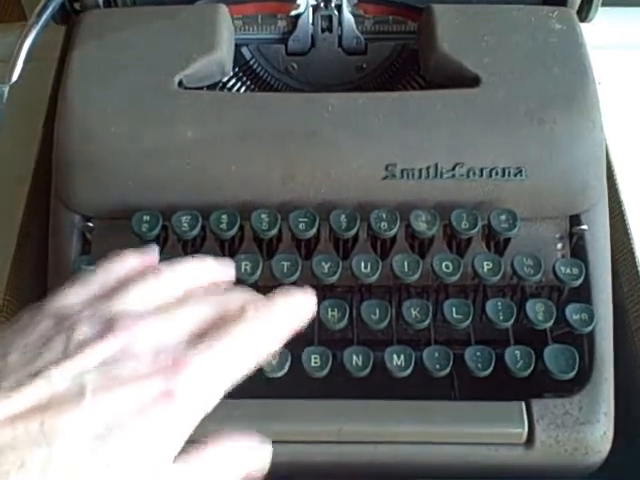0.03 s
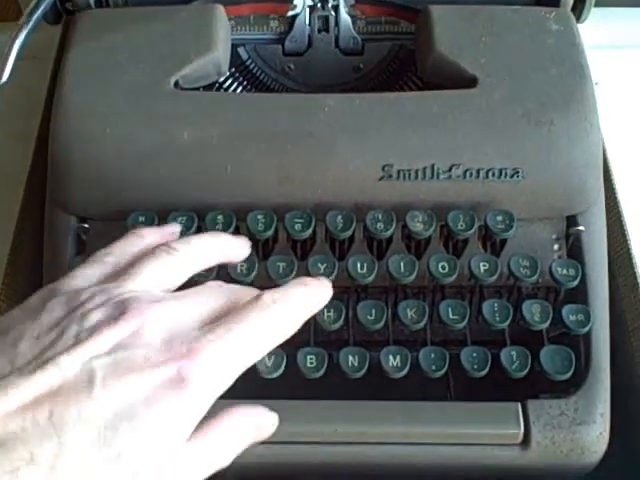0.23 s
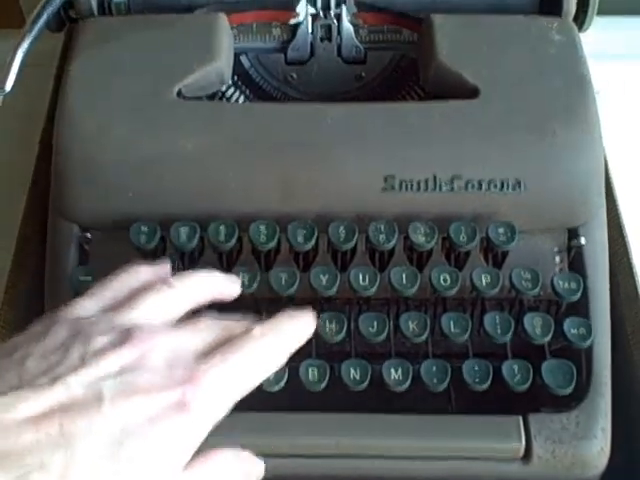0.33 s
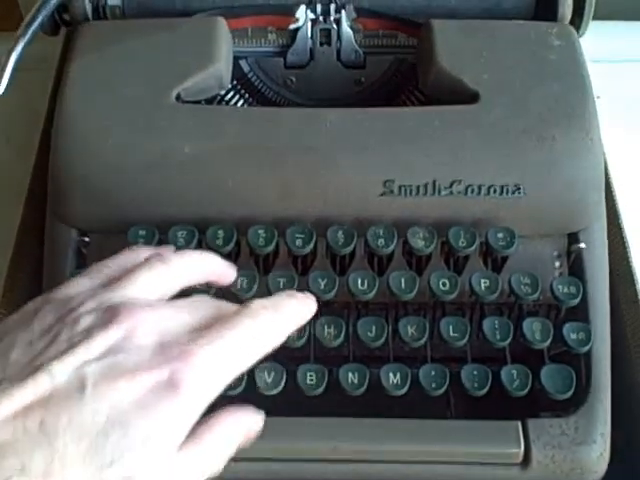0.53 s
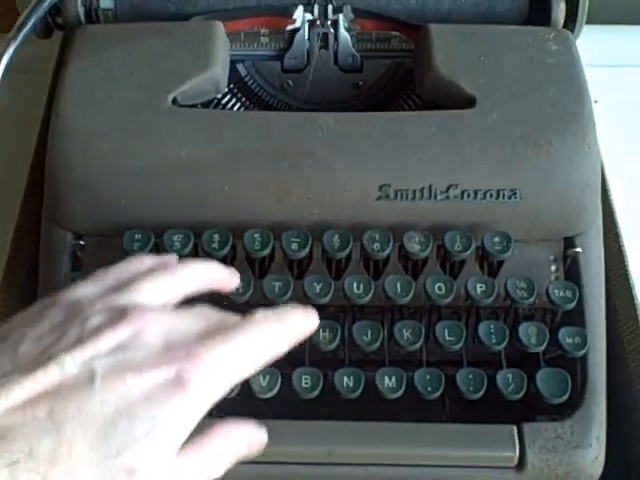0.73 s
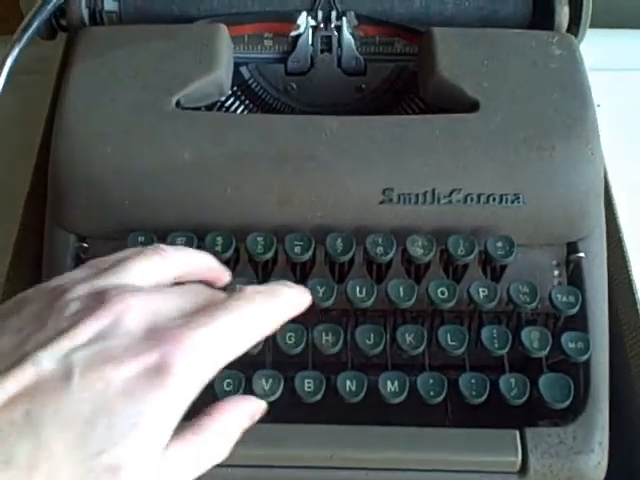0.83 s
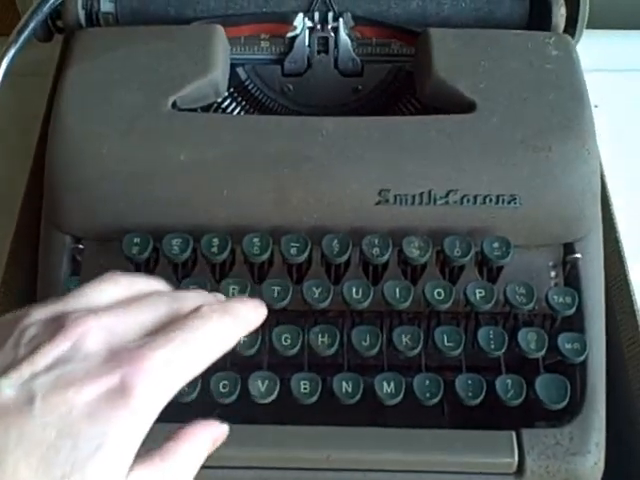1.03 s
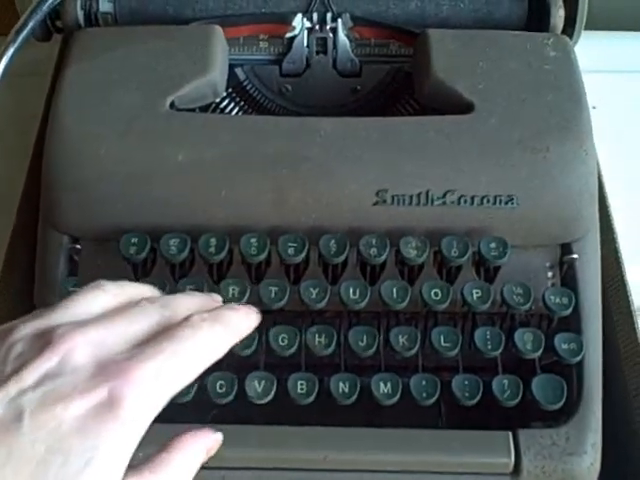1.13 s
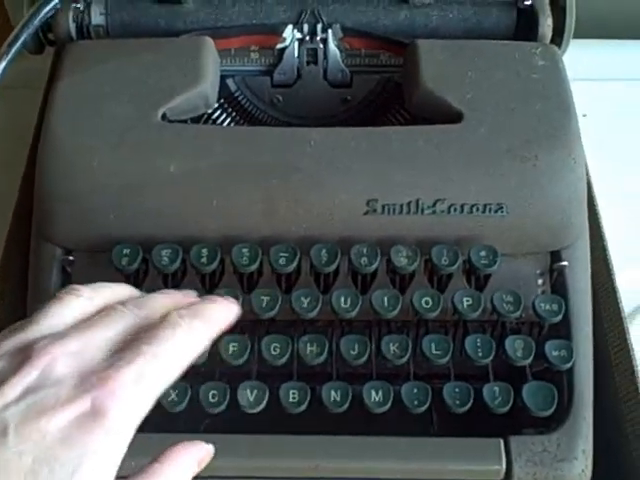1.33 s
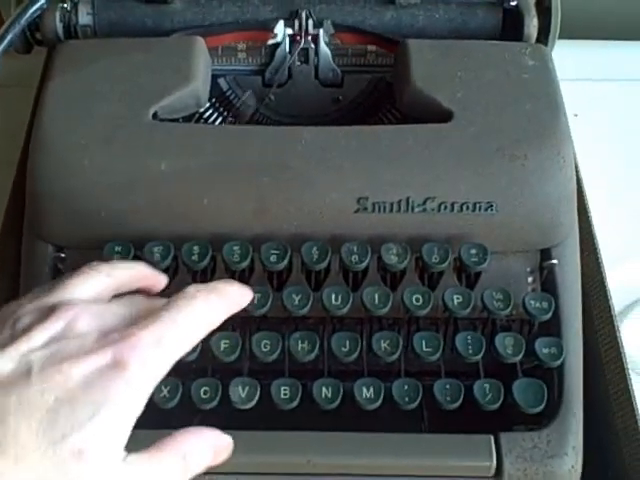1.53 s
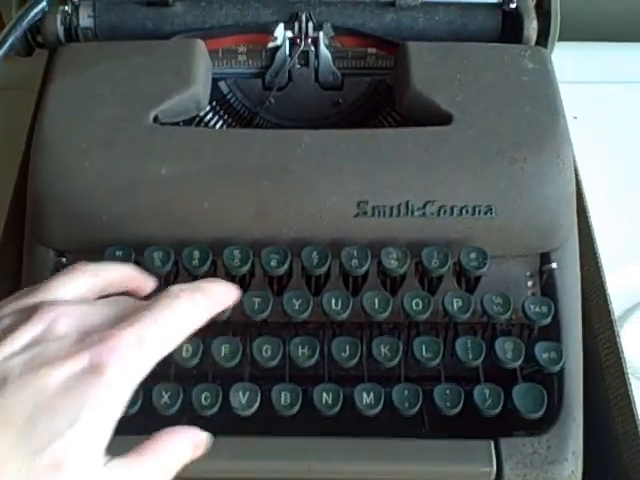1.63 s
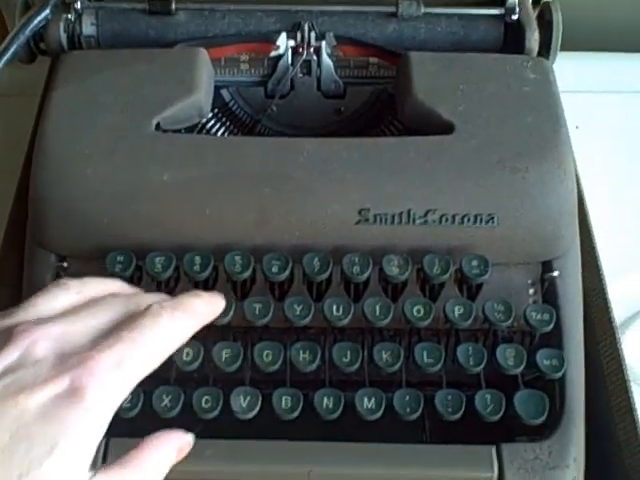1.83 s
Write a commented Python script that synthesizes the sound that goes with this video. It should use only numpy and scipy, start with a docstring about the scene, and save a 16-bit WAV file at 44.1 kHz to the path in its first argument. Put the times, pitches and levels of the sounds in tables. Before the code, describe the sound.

An old manual typewriter is worked close by in a quiet, faintly humming room. Two light clacks are followed by a hard one, a pause, then another hard strike, each with lever clicks and soft case thumps.

```python
"""A quiet room with a mains hum, where an old manual typewriter is worked by one hand, close by. Two lighter
clacks come from the mechanism as keys are released, then two hard strokes slam a type bar onto the platen.
Levers click before and after each blow, and a faint squeak precedes the first hard stroke. The impacts set the
steel frame ringing, and the case thumps on the desk as keys bottom out and return."""
import sys
import numpy as np
from scipy import signal
from scipy.fft import rfft, irfft, next_fast_len
from scipy.io import wavfile
from scipy.ndimage import uniform_filter1d, map_coordinates

SR = 44100
rng = np.random.default_rng(int(sys.argv[2]) if len(sys.argv) > 2 else 0)


def generate_wav(sig):
    """Save sig (samples, or channels by samples) to the path in sys.argv[1] as 16-bit PCM at SR."""
    pcm = np.round(np.clip(np.atleast_2d(sig).T, -1, 1) * 32767).astype(np.int16)
    wavfile.write(sys.argv[1], SR, pcm)


N = 83790
STEEL_RISE_S = 0.00018


def amp(db):
    """Amplitude ratio: a factor of ten for every 20 dB."""
    return 10 ** (np.asarray(db) / 20)


def unit(x):
    """Normalisation to rms 1."""
    return x / np.sqrt(np.mean(x ** 2) + 1e-20)


def along(points, hz):
    """Interpolation of (f/Hz, value) points on a logarithmic frequency axis."""
    f, values = np.transpose(points)
    return np.interp(np.log(hz + 1), np.log(f + 1), values)


def add(track, start_s, sound):
    """Superposition: a sound adds linearly to the track."""
    i = max(0, round(start_s * SR))
    track[i:i + len(sound)] += sound[:N - i]


def noise(colour, size, tilt_db=0, body_hz=1000, lift_db=0):
    """Random-phase noise of rms 1, tilted by tilt_db an octave and lifted around one resonance."""
    hz = np.fft.rfftfreq(size, 1 / SR)
    body = np.exp(-(np.log2((hz + 1) / body_hz) / 0.4) ** 2)  # falls to 1/e at 0.4 octave
    octaves = np.log2(np.maximum(hz, 400) / 4000)
    gain = amp(along(colour, hz) + tilt_db * octaves + lift_db * body)
    return unit(irfft(gain * np.exp(2j * np.pi * rng.random(len(hz))), size))


def mode(hz, db, t60, rise_s):
    """Damped free vibration: a sinusoid that builds up, then loses 60 dB in t60 seconds."""
    t = np.arange(SR // 2) / SR
    envelope = amp(db - 60 * t / t60) * (1 - np.exp(-t / rise_s))
    return np.sqrt(2) * envelope * np.sin(2 * np.pi * (hz * t + rng.random()))


def contact(colour, db, tilt_db, hold_s, t60, *resonance):
    """Impact noise: steel chatters on steel while contact lasts, then decays exponentially."""
    t = np.arange(4096) / SR
    rise = 1 - np.exp(-t / STEEL_RISE_S)
    fall = amp(-60 * np.maximum(t - hold_s, 0) / t60)
    return amp(db) * rise * fall * noise(colour, len(t), tilt_db, *resonance)


def dense_modes(drive, gains, t60s, count=5):
    """Modal overlap: countless modes respond like noise, each band decaying at its own rate."""
    hz, t, spectra = signal.stft(rng.standard_normal((count, SR // 2)), SR, nperseg=256)
    fade = amp(-60 * t / along(t60s, hz)[:, None])
    energy = np.mean(fade ** 2, axis=1, keepdims=True) * (SR // 2)
    fade *= amp(along(gains, hz))[:, None] / np.sqrt(energy)
    responses = signal.istft(spectra * fade, SR, nperseg=256)[1]
    # the responses take turns, so successive contacts shake different modes
    turn = np.arange(N) // 80 % count == np.arange(count)[:, None]
    shares = uniform_filter1d(turn * 1., size=24, axis=1)
    return signal.fftconvolve(drive * shares, responses, axes=1).sum(axis=0)[:N]


def room_air():
    """Ambient noise: a continuous spectrum, strongest in the bass."""
    # spectrum of the air: f/Hz, relative level/dB
    spectrum = [(12, -51), (20, -17), (65, -2.5), (91, -12.5), (177, -11), (204, -18), (234, -13.5),
                (347, -19), (527, -24.5), (802, -27.5), (1290, -31.5), (1570, -32.5), (16000, -49.5)]
    return amp(-44) * noise(spectrum, N)


def mains_hum():
    """Line spectrum: an appliance hums near multiples of the mains frequency; the lowest line wavers."""
    # hum lines: f/Hz, level/dB
    partials = [(59, -53.5), (118, -56.5), (177, -53.5), (236, -55.5), (527.6, -59.5), (587, -62)]
    # swell of the lowest line: t/s, added level/dB
    swell = [(0, 16), (.3, 3), (.6, 3), (.85, -18), (1.0, -29), (1.17, -22), (1.24, 3), (1.45, 10),
             (1.6, 11.5), (1.9, 7.5)]
    t = np.arange(N) / SR
    lines = [np.sqrt(2) * amp(db) * np.sin(2 * np.pi * (hz * t + rng.random())) for hz, db in partials]
    return lines[0] * amp(np.interp(t, *np.transpose(swell))) + sum(lines[1:])


def reverberation(direct):
    """Diffuse field: the room's reflections die away, soonest in the treble."""
    # room response: f/Hz, gain/dB
    gains = [(100, 3.5), (500, -6), (1500, -13.5), (4000, -13), (8000, -14.5), (15000, -16)]
    # reverberation time: f/Hz, T60/s
    t60s = [(200, 0.55), (1500, 0.51), (6000, 0.41), (15000, 0.39)]
    return dense_modes(direct, gains, t60s)


def squeak(start_s=0.555, length_s=0.11, db=-53.5, width_hz=550):
    """Friction: a faint narrow band of rubbing noise slides down in pitch."""
    out, t = np.zeros(N), np.arange(round(length_s * SR)) / SR
    grain = unit(map_coordinates(rng.standard_normal(size=256), [t * width_hz]))
    pitch_hz = np.linspace(2800, 2330, len(t))
    phase = 2 * np.pi * np.cumsum(pitch_hz) / SR
    add(out, start_s, amp(db) * np.sqrt(2) * signal.windows.tukey(len(t)) * grain * np.sin(phase))
    return out


def case_thumps(fall_db_per_octave=5.5, pitch_scatter=0.0033):
    """Modal excitation: each jolt rings the case and desk, most strongly near its own frequency."""
    # jolts of the case on the desk: t/s, level/dB, most excited f/Hz
    jolts = [(0, -30.5, 165), (0.041, -31.5, 62), (.163, -38, 420), (.215, -34.5, 549), (.245, -26.5, 149),
             (0.287, -29, 62), (0.405, -32, 396), (0.451, -31, 306), (0.472, -26.5, 142), (.520, -31, 100),
             (.681, -24.5, 600), (.728, -30, 145), (0.771, -37.5, 340), (0.834, -36, 500),
             (1.540, -30.5, 412), (1.578, -29, 119), (1.640, -31.5, 600)]
    # modes of case and desk: f/Hz, relative level/dB, T60/s
    modes = [(62, -5, .25), (122, -1, 0.13), (154.8, -2, 0.35), (199.7, -1, .2), (300, -5.5, 0.27),
             (387.3, -12.5, 0.54), (411.7, -7.5, .18), (499, -18, 0.17), (525, -8.5, .2), (572, -16, 0.31),
             (712, -19, .18), (940, -12, 0.28)]
    out = np.zeros(N)
    for start_s, jolt_db, centre_hz in jolts:
        for hz, mode_db, t60 in modes:
            loss_db = fall_db_per_octave * abs(np.log2(hz / centre_hz))
            db = jolt_db + mode_db - loss_db + rng.normal(0, 1)
            scattered_hz = hz * (1 + pitch_scatter * rng.normal())
            add(out, start_s, mode(scattered_hz, db, t60, rise_s=0.003))
    return out


def frame_ring(impacts):
    """Resonance: impacts drive the closely spaced modes of the steel frame."""
    # frame response: f/Hz, gain/dB
    gains = [(100, -4.5), (500, -1.5), (1500, -1), (4000, -3.5), (8000, -9.5), (15000, -17)]
    # frame decay time: f/Hz, T60/s
    t60s = [(200, .14), (1500, 0.14), (6000, 0.13), (15000, .07)]
    return dense_modes(impacts, gains, t60s)


def steel_parts():
    """Free vibration: bars, springs and panels ring briefly at their natural frequencies."""
    # parts left ringing by a stroke: t/s, f/Hz, level/dB, T60/s
    pings = [(.159, 9300, -28, .04), (.163, 1467, -35.5, 0.057), (0.164, 1770, -35.5, 0.046),
             (.213, 3290, -33, .09), (.213, 6210, -32, .09), (.213, 2560, -28.5, 0.06),
             (.272, 572, -29.5, 0.13), (.417, 9520, -26, .03), (.4485, 6330, -25, 0.046),
             (.4485, 881, -35.5, 0.095), (.514, 563, -33.5, 0.13), (.6805, 8900, -17, 0.074),
             (.6805, 596, -25, 0.07), (.6805, 1416, -22, 0.033), (.6805, 2810, -31, 0.08),
             (1.52, 1077, -27, .07), (1.526, 2768, -23, 0.05), (1.526, 6650, -18, .05),
             (1.526, 14100, -18, .03), (1.526, 1748, -31, 0.11), (1.639, 890, -32.5, 0.046),
             (1.639, 1780, -32, 0.037), (1.639, 3430, -32, .025), (1.639, 10200, -27, .025)]
    out = np.zeros(N)
    for start_s, hz, db, t60 in pings:
        add(out, start_s, mode(hz, db, t60, STEEL_RISE_S))
    return out


def lever_clicks(hold_s=0.00081):
    """Short impacts have broad spectra: levers, links and escapement click around each blow."""
    # clicks: t/s, level/dB, tilt/(dB/octave), T60/s
    clicks = [(.002, -32, -2, 0.16), (.008, -24.5, 20, 0.0035), (.051, -39, -2, 0.17),
              (.060, -33, 13, .012), (.090, -44, 0, 0.019), (.107, -34, -2, 0.045),
              (.135, -39.5, -3.5, 0.15), (0.1583, -21.5, 3.5, 0.027), (.163, -29, -4, 0.055),
              (0.182, -36.5, 1, 0.069), (0.2012, -25.5, -2, 0.096), (.222, -28, -3, 0.014),
              (.228, -28.5, -5, 0.042), (0.252, -37, 2.5, .04), (.266, -29, -3, 0.061),
              (0.289, -35.5, 2.5, 0.016), (.349, -36, 0, .02), (0.376, -39, -4.5, 0.024),
              (.382, -31, 1, 0.032), (0.4007, -21, 1.5, 0.033), (.406, -29.5, -4, .05),
              (.417, -26, -2, 0.067), (0.467, -28, 0, .02), (.489, -37.5, -2.5, 0.065),
              (.508, -35, 0, 0.066), (0.516, -33, -6, 0.075), (.536, -41, 0.5, 0.073),
              (0.55, -41.5, 0, 0.027), (0.6249, -39, -0.5, 0.036), (0.6536, -38, -2.5, 0.094),
              (.6575, -28, 0, .025), (0.6717, -14, 2, 0.039), (.688, -20.5, -3, 0.015),
              (0.691, -14.5, 2.5, 0.016), (0.704, -36, -6, 0.013), (.716, -26.5, -1.5, 0.092),
              (0.726, -28.5, 2, 0.075), (0.751, -33, -1.5, 0.1), (0.769, -28, -2, 0.034),
              (0.7754, -25.5, -1, 0.047), (0.831, -38.5, 2, 0.13), (.845, -34, -0.5, 0.089),
              (.856, -29.5, 2, 0.025), (.862, -32.5, 2.5, 0.023), (0.889, -42.5, 0, .05),
              (1.046, -48, -3, 0.11), (1.072, -45, -2, 0.017), (1.180, -44.5, -1.5, .02),
              (1.407, -55, 3, .03), (1.474, -42, -2.5, .03), (1.478, -34, -1.5, 0.077),
              (1.5068, -27.5, -0.5, 0.076), (1.5178, -17.5, 0, .05), (1.5234, -14.5, 4, 0.017),
              (1.534, -28, -2, 0.15), (1.561, -17.5, -1, 0.022), (1.6384, -22.5, 2, 0.028),
              (1.643, -25.5, -4, 0.015), (1.676, -41, -0.5, .03)]
    # click spectrum: f/Hz, relative level/dB
    colour = [(100, -14), (400, 3), (900, 0.5), (1200, -7.5), (1700, 2.5), (2300, -2), (3500, -2.5),
              (6500, -1.5), (8000, -2.5), (9600, 1.5), (11500, -1.5), (15500, -2.5), (18000, -30)]
    out = np.zeros(N)
    for start_s, db, tilt_db, t60 in clicks:
        add(out, start_s, contact(colour, db, tilt_db, hold_s, t60))
    return out


def type_blows():
    """Impact excitation: each main blow, whether a key's return clack or a type bar's strike, is a noise burst
    coloured by a body resonance."""
    # blows: t/s, level/dB, tilt/(dB/octave), contact time/s, T60/s, resonance f/Hz, its lift/dB
    blows = [(.2127, -19, -1, .002, .045, 3400, 4), (.4482, -13.5, 0, .002, .02, 900, 5),
             (.6802, -6, .5, .0028, .012, 620, 8), (1.5257, -5, .2, .002, .016, 1050, 6)]
    # blow spectrum: f/Hz, relative level/dB
    colour = [(100, -11), (300, -7.5), (600, -3.5), (1100, -10), (1700, -2), (2200, -6), (2800, 1),
              (4500, -0.5), (6500, 3.5), (9000, 1), (11500, -6), (15500, -1), (18000, -38)]
    out = np.zeros(N)
    for start_s, *blow in blows:
        add(out, start_s, contact(colour, *blow))
    return out


def scene():
    """Source and resonator in series: impacts shake the frame, and the ringing steel excites the room."""
    impacts = type_blows() + lever_clicks()
    machine = impacts + frame_ring(impacts) + steel_parts()
    return (machine + reverberation(machine) + case_thumps() + squeak() + mains_hum() + room_air())[None]


def record(dry, ceiling=0.82, top_hz=16100, edge_hz=450):
    """Saturation rounds off the loudest peaks, and a low-pass filter limits the bandwidth."""
    clipped = dry / (1 + np.abs(dry / ceiling) ** 4) ** (1 / 4)
    size = next_fast_len(N + SR // 2)
    hz = np.fft.rfftfreq(size, 1 / SR)
    low_pass = np.clip((top_hz - hz) / edge_hz, 0, 1) ** 2
    return irfft(rfft(clipped, size) * low_pass, size)[:, :N]


dry = scene()
out = record(dry)
generate_wav(out)
```